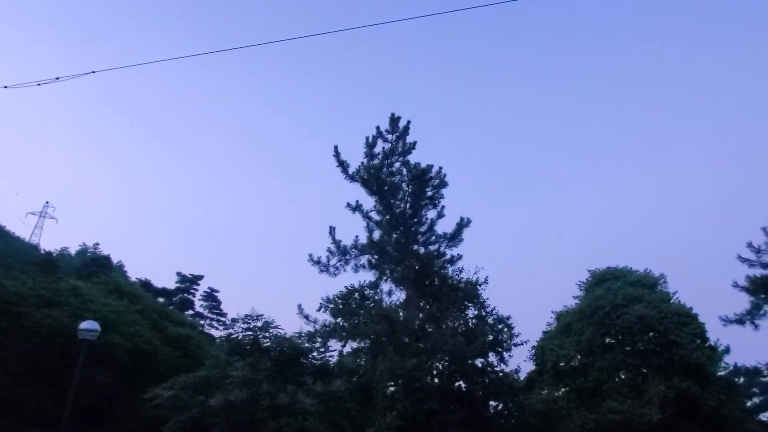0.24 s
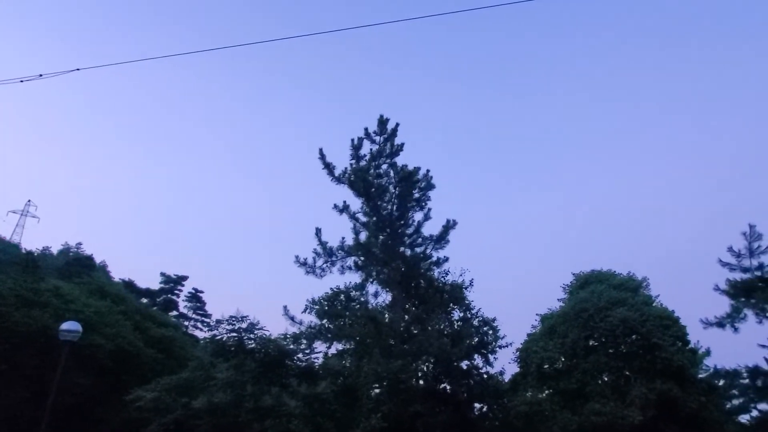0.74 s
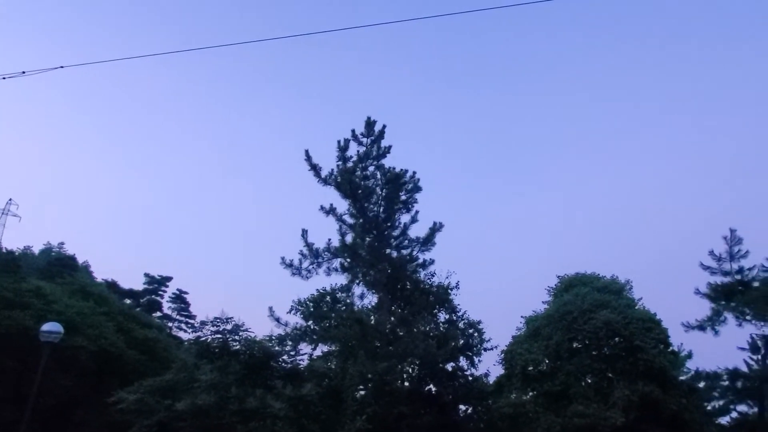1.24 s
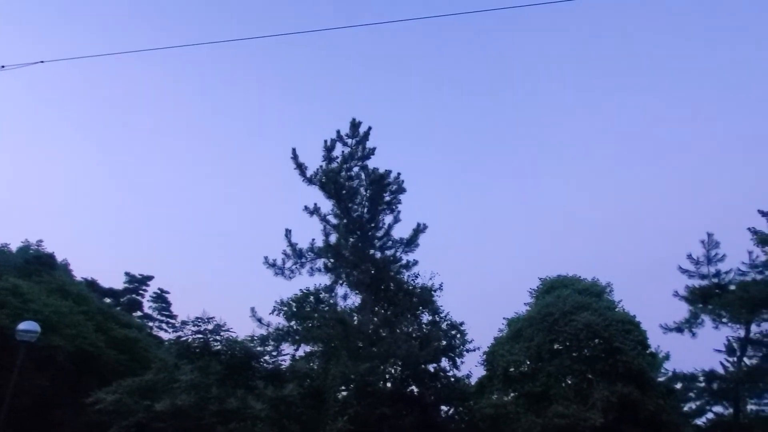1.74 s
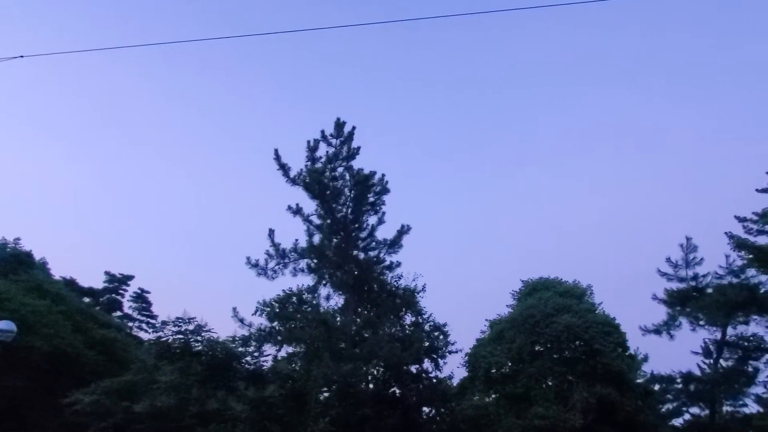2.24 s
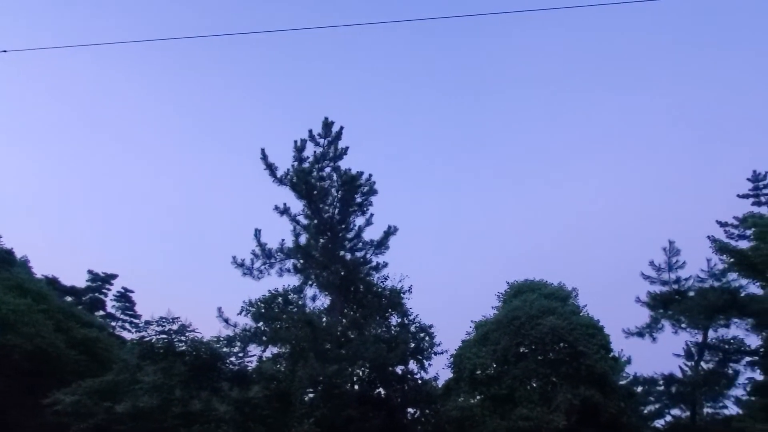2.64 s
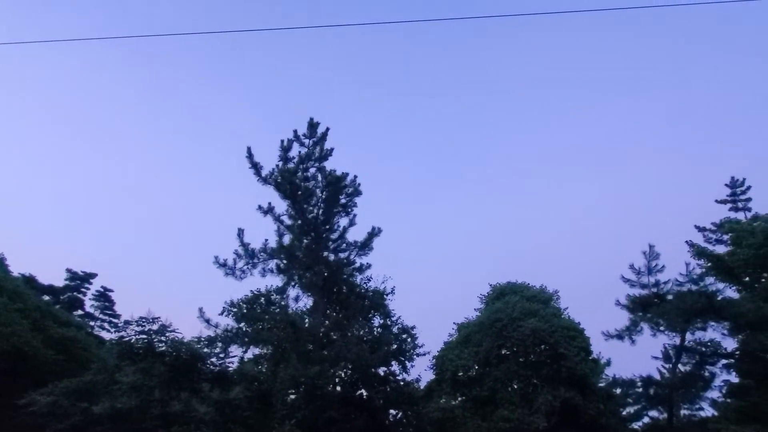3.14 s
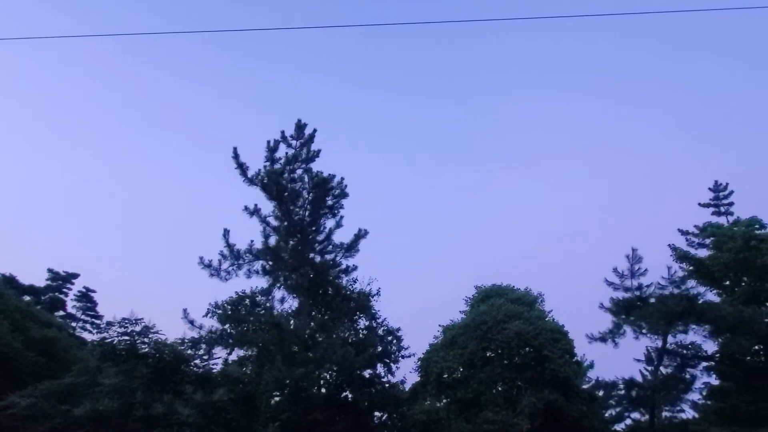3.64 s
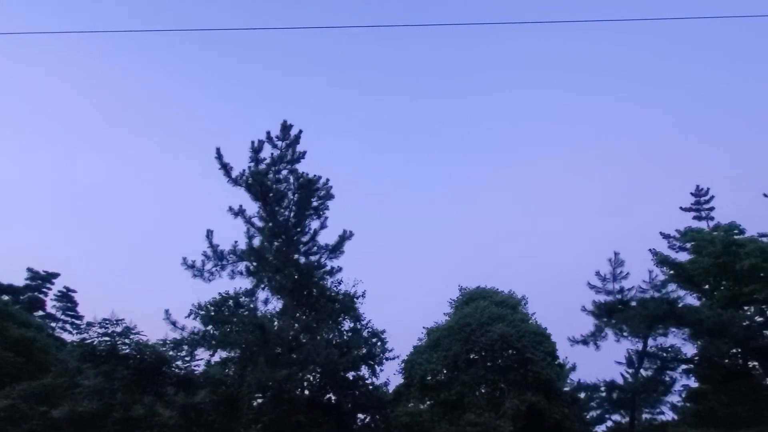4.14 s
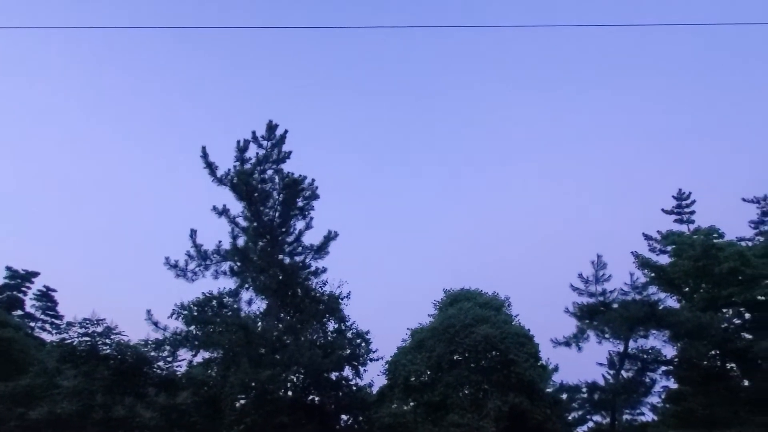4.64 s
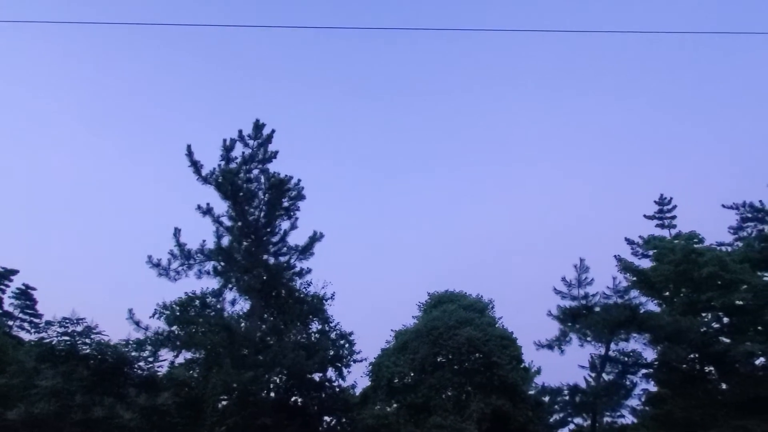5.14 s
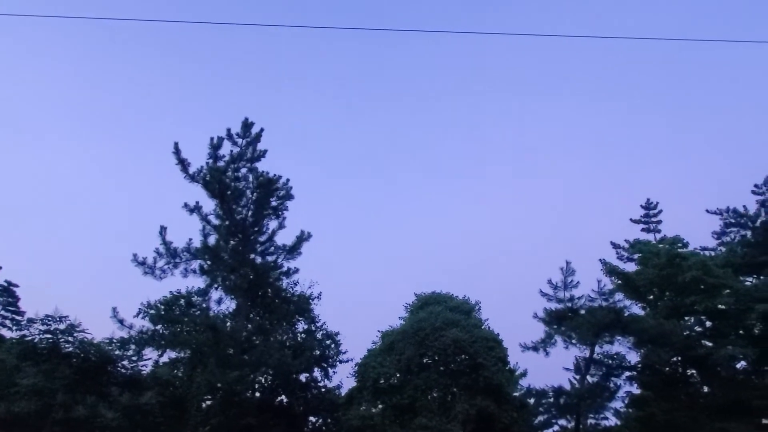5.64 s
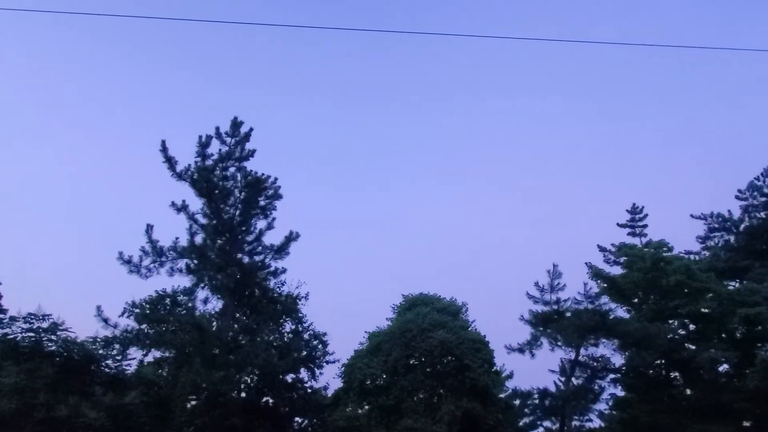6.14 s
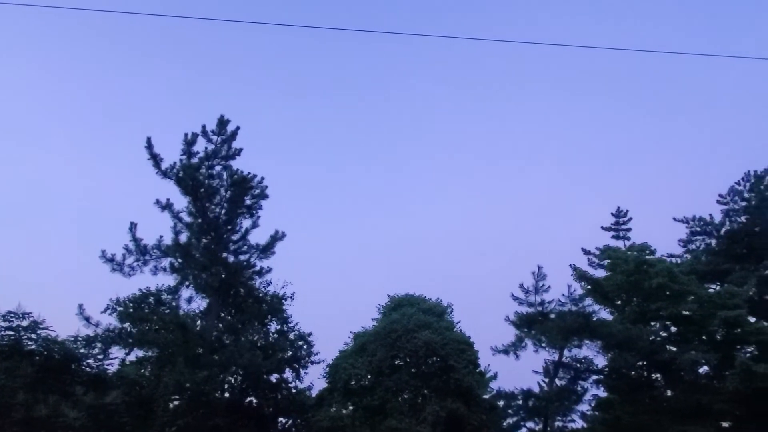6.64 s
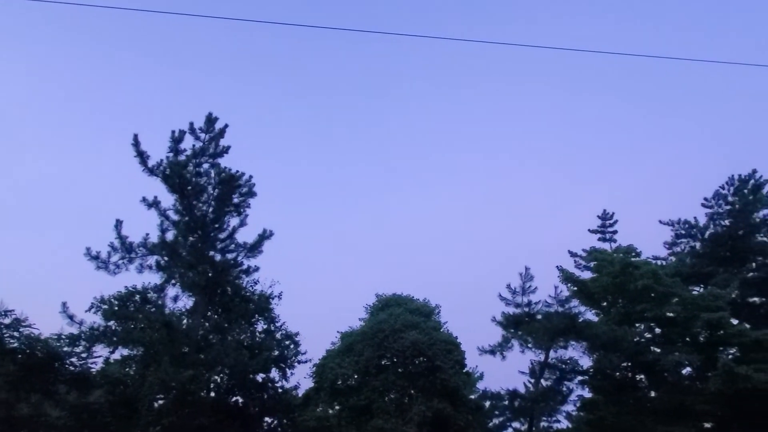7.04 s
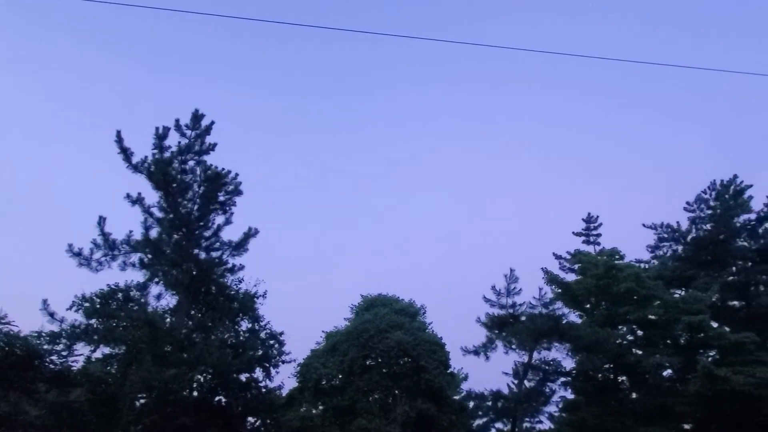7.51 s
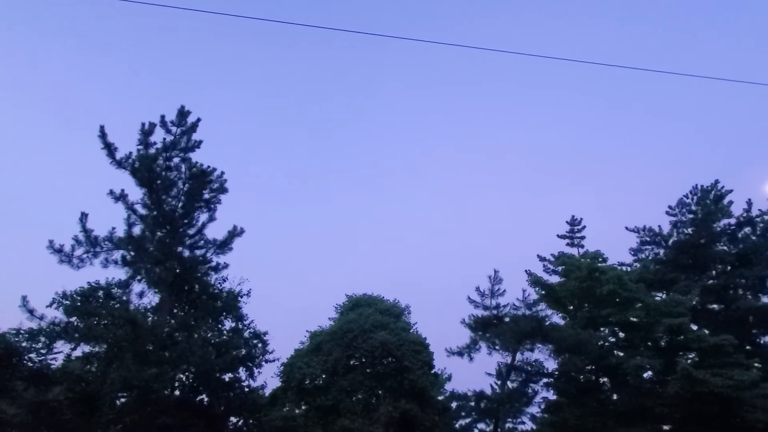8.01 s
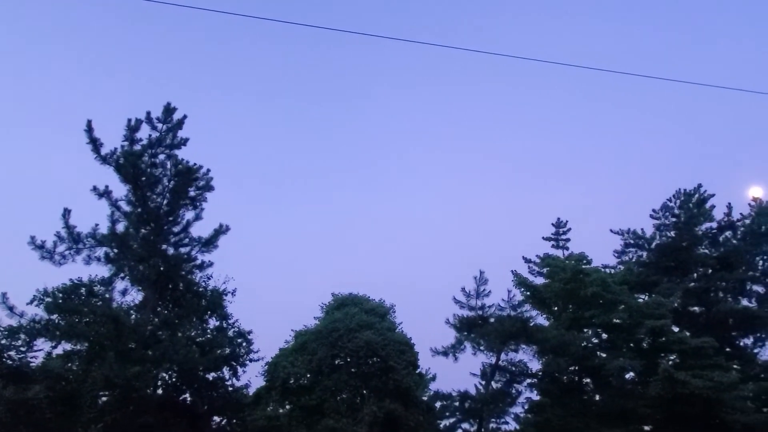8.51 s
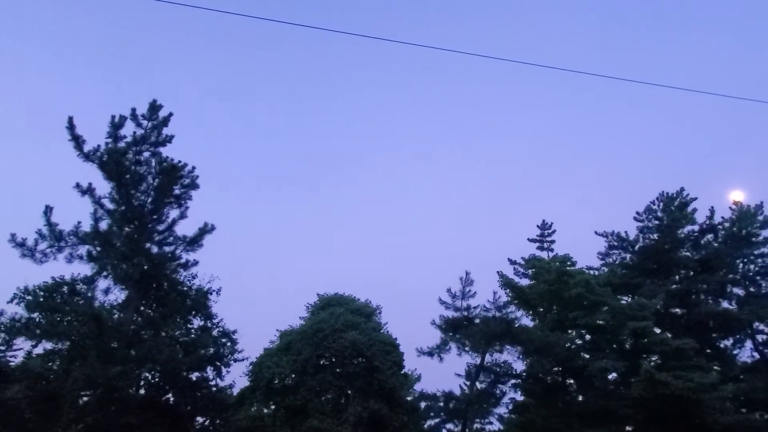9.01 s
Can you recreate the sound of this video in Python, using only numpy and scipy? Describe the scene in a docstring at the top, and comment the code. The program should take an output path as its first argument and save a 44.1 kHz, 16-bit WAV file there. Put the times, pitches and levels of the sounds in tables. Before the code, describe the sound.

A wooded valley at dusk, thick with cicadas. From 0 s a dense, high, sizzling buzz fills both sides, with a steady dry rattle and a slightly deeper buzz inside it, flickering in brief dips. Far evening cicadas throb together at a middle-high pitch, smeared by the trees. At about 0.8 s a near singer begins: clear, whistling, reedy syllables some ten per second, strongest near 1.1 s, each sagging in pitch, the whole phrase sinking slowly, its last pulses slower, ending near 7 s. A slightly higher distant phrase swells around 2.5 s and fades by 7 s. New near trills enter at 8.3 and 8.6 s and continue to the cut at about 9.3 s. Low wind thumps and flutters strike the stereo microphone irregularly, heavier on the left, notably near 0.6, 1.4, 4.2, 5.3 and 6.7 s, over a faint airy floor.

```python
"""Evening cicadas trill clear, falling syllables about ten times a second in a wooded valley at dusk.
Near singers are sums of partials of a tymbal click train; far ones are throbbing tones heard through trees.
Other cicadas buzz densely and high: blurred click trains, filtered. Gusts buffet the two microphone
ports, each on its own, as low-passed noise; filtered noise makes the faint floor of the valley."""
import sys
import numpy as np
from scipy import signal
from scipy.fft import rfft, irfft
from scipy.io import wavfile
from scipy.ndimage import uniform_filter1d

SR = 44100
rng = np.random.default_rng(int(sys.argv[2]) if len(sys.argv) > 2 else 0)


def wrap_up_sound(samples):
    """Save the sound to the file named by the first command line argument, as 16-bit audio."""
    columns = np.atleast_2d(samples).T
    # keep every value between -1 and 1, then stretch to whole-number steps
    tamed = np.clip(columns, -1, 1)
    steps = np.round(tamed * 32767).astype(np.int16)
    wavfile.write(sys.argv[1], SR, steps)


def to_linear_factor(level_db):
    """Convert decibel levels (scalar or array-like) to linear amplitude factors."""
    exponent = np.asarray(level_db, float) / 20
    return 10 ** exponent


N = 408807
FFT_SIZE = N + 793   # 409600 points, a fast size

# Partials of the click train: (multiple of body tone [1], level re its group [dB], lead of its peak [s]).
# Groups: body tone, octave and upper partials; the top ones go by the mean dB of octave and upper.
NEAR_PARTIALS = [(.833, -24, .001), (1.0, 0, .001), (1.833, -16, -.004), (2.0, 0, .001), (2.333, -18, .001),
                 (2.833, -5, .005), (3.0, 1.5, .005), (4.0, -3, .005), (5.0, -19, .006), (5.833, -18, .009),
                 (6.0, -18, .009)]
LATE_PARTIALS = [(.857, -14, .001), (1.0, 0, .001), (1.857, -18, .001), (2.0, 0, .001), (2.125, -17, .001),
                 (2.274, -1, .001), (2.4, -9, .001), (3.0, 0, .005), (5.0, -13, .006)]
# Course of each song: (time [s], body tone [Hz], body level [dB], upper partials' level [dB], pan L-R [dB])
NEAR_PHRASE = [(.77, 2043, -50, -52, 2), (.87, 2042, -50, -50, 2), (1.06, 2083, -39, -45, -1.5),
               (1.45, 2080, -44, -45, -1), (1.8, 2058, -43, -45, -2), (2.3, 2043, -44, -46, .5),
               (3.0, 2034, -45, -48, 1), (4.0, 2032, -44, -47, 2.5), (5.0, 2023, -43, -46, 2.5),
               (5.95, 2020, -45, -47, 1.5), (6.15, 2001, -46, -47, 3), (6.8, 1980, -49, -47.5, 2),
               (7.0, 1979, -51, -52, 1.5)]
LATE_PHRASE = [(8.32, 2102, -57, -56, -1), (8.52, 2169, -50, -51, -1), (8.8, 2170, -45, -49, -.5),
               (9.2, 2140, -48, -53, 1)]
LOW_PHRASE = [(8.6, 2074, -60, -45, -1), (9.2, 2030, -51, -46, 1)]
# Tempo: (syllable number [1], gap before it [s])
NEAR_TEMPO = [(0, .0966), (12, .1), (16, .1055), (22, .0995), (40, .1041), (52, .1113), (58, .1757)]
LATE_TEMPO = [(0, .103), (9, .092)]
LOW_TEMPO = [(0, .1), (6, .098)]
# Octave of the body tone: (time [s], level [dB])
NEAR_OCTAVE = [(.77, -38.5), (.96, -35.5), (1.1, -26), (1.28, -29.5), (1.47, -40), (1.64, -33), (2.1, -35),
               (2.3, -34.5), (2.68, -36.5), (2.88, -45), (3.08, -45), (3.18, -42), (3.5, -38.5),
               (3.8, -35.5), (4.5, -36.5), (4.85, -32), (5.05, -35), (5.4, -32), (5.77, -34.5),
               (6.2, -42.5), (7.0, -45.5)]
LATE_OCTAVE = [(8.321, -39), (8.45, -39), (8.82, -38), (9.051, -41), (9.2, -39.5)]
LOW_OCTAVE = [(8.6, -42), (8.7, -61), (9.05, -48), (9.2, -60)]
# Delay of the right port as the microphone slowly turns: (time [s], lag [ms])
NEAR_LAG = [(1.0, -.3), (4.2, -.244), (6.5, -.18)]
LATE_LAG = [(8.3, .43), (9.2, .43)]


def close_singers():
    """Direct and reverberant sound: three singers stand out, with the forest ringing behind them."""
    near = trill(syllables(.7673, NEAR_TEMPO, NEAR_OCTAVE), NEAR_PHRASE, NEAR_PARTIALS, NEAR_LAG,
                 sigma_s=.013, spread_db=1.5, low_pan_db=-2.5)
    late = trill(syllables(8.321, LATE_TEMPO, LATE_OCTAVE), LATE_PHRASE, LATE_PARTIALS, LATE_LAG,
                 sigma_s=.015, spread_db=1.5, low_pan_db=1.5)
    low = trill(syllables(8.605, LOW_TEMPO, LOW_OCTAVE), LOW_PHRASE, NEAR_PARTIALS, LATE_LAG,
                sigma_s=.014, spread_db=2.0, low_pan_db=.3)
    direct = near + late + low
    return direct + to_linear_factor(-12.5) * forest(direct.mean(axis=0), t60_s=0.56)


def syllables(start_s, tempo, octave, uneven_db=1):
    """Rhythm: syllable times are summed gaps; octave levels follow the phrase, a little uneven."""
    number, gap_s = np.transpose(tempo)
    count = np.arange(number[-1] + 1)
    gaps_s = np.interp(count, number, gap_s) * (count > 0)
    s = start_s + np.cumsum(gaps_s)
    octave_db = np.interp(s, *np.transpose(octave)) + uneven_db * rng.standard_normal(len(s))
    return np.transpose([s, octave_db])


def trill(syllables, phrase, partials, lags, sigma_s, spread_db, low_pan_db, rough_db=2.0, rough_per_s=150):
    """Additive synthesis: each syllable is a swell of tymbal clicks, heard as partials with staggered peaks."""
    margin = 4096
    out = np.zeros((2, N + 2 * margin))
    span = np.arange(-2048, 2048)
    t = span / SR
    multiple, level_db, lead_s = np.transpose(partials)[:, :, None]
    group = np.digitize(multiple, [1.5, 2.2, 4.5])   # body, octave, upper, top
    swell = np.exp(-.5 * ((t + lead_s) / sigma_s) ** 2)
    draws = rng.standard_normal((len(syllables), 2, len(partials), 1))
    rough = to_linear_factor(rough_db * drift(rough_per_s)[0])   # click strength wavers within a syllable
    when, *columns = np.transpose(phrase)
    for (s, octave_db), (vary, turn) in zip(syllables, draws):
        hz, body_db, upper_db, pan_db = [np.interp(s, when, c) for c in columns]
        group_db = np.choose(group, [body_db, octave_db, upper_db, (octave_db + upper_db) / 2])
        db = group_db + level_db + spread_db * vary * (multiple != 2)   # all but the octave vary
        lag_s = np.interp(s, *np.transpose(lags)) / 1000
        where = round(s * SR) + margin + span
        for channel, side in enumerate((.5, -.5)):
            late = t - channel * lag_s   # the lag shifts the right port's phase
            phase = 2 * np.pi * multiple * hz * (late - .1 * late ** 2 / 2)   # the tone sags
            size = np.sqrt(2) * to_linear_factor(db + side * np.where(group == 0, low_pan_db, pan_db))
            out[channel, where] += np.sum(size * swell * np.sin(phase + 9 * turn), axis=0)
    return out[:, margin:margin + N] * rough / np.sqrt(np.mean(rough ** 2))


# Noise spectrum: (frequency [Hz], relative level [dB])
FOLLOWING_COLOUR = [(1500, -81), (2300, 32), (3000, 22), (3600, -20), (4700, -30), (5400, -16), (7000, -37)]


def following_noise(song, noise_db=-32):
    """Envelope following: a faint broad noise rises and falls with the song's level."""
    loudness = np.sqrt(uniform_filter1d(song ** 2, size=600, axis=1) + 1e-18)
    return to_linear_factor(noise_db) * loudness * coloured(rng.standard_normal((2, N)), FOLLOWING_COLOUR)


# Distant evening cicadas: (time [s], body tone level [dB], octave re body tone, before a 3.5 dB lift [dB])
FAR_CHORUS = [(0.0, -47, -3), (1.37, -50, 1), (1.44, -48, 0), (1.99, -51.5, 3.5), (2.55, -46, 2),
              (5.42, -48, -1), (5.68, -49.5, 2), (7.95, -51.5, -2), (8.8, -47, 3), (9.27, -43, 0)]
# One phrase among the distant singers: (time [s], body tone [Hz], level [dB])
FAR_PHRASE = [(2.15, 2140, -69), (2.35, 2183, -49), (2.65, 2254, -45.5), (3.2, 2199, -50.5),
              (4.5, 2170, -49), (5.7, 2162, -52.5), (6.9, 2137, -62), (7.2, 2160, -62)]


def far_singers(count=18, middle_hz=2115, spread=.02):
    """Multiple scattering: singers of many pitches and trill rates reach the ports only through the trees."""
    body_db, octave_db = in_time(FAR_CHORUS)
    places = np.sinh(np.linspace(-1.7, 1.7, count))   # most sing near the middle pitch
    body, octave = sum(unseen_singer(middle_hz * (1 + spread * place), rng.uniform(8.5, 11), 6 + k % 4)
                       for k, place in enumerate(places))
    body = rms_one(forest(body, t60_s=0.42))
    octave = rms_one(forest(octave, t60_s=0.73))
    crowd = to_linear_factor(body_db) * (body + to_linear_factor(octave_db + 3.5) * octave)
    pitch_hz, level_db = in_time(FAR_PHRASE)
    body, octave = rms_one(unseen_singer(pitch_hz, 11.2, 12)) * to_linear_factor(level_db)
    return crowd + forest(body + to_linear_factor(-6.0) * octave, t60_s=0.24)


def unseen_singer(pitch_hz, rate_hz, clicks_per_cycle, sides_db=-16, upper_sides_db=-8, waver=.006):
    """Amplitude modulation: body tone and octave, each with a side tone, throb at the trill rate."""
    wander = waver * drift(2.5)[0] + .009 * drift(60)[0]
    turn = 2 * np.pi * np.cumsum(pitch_hz * (1 + wander)) / SR
    beat = 2 * np.pi * (rate_hz * np.arange(N) / SR + rng.random())
    throb = np.exp(3.0 * np.cos(beat)) * to_linear_factor(2.5 * drift(.8)[0])
    side = turn * (1 - 1 / clicks_per_cycle)   # one click rate below the body tone
    body = np.sin(turn) + to_linear_factor(sides_db) * np.sin(side)
    octave = np.sin(2 * turn) + to_linear_factor(upper_sides_db) * np.sin(turn + side)
    return throb * np.array([body, octave])


# Swarm spectrum: (frequency [Hz], relative level [dB])
SWARM_COLOUR = [(2940, -27), (5000, -17), (5400, -14), (5960, -65), (6590, -0.5), (7200, 5.5), (7800, 1.5),
                (8520, 5.5), (10600, -17.5), (12500, -25), (16200, -23), (22000, -120)]
# One singer with a steady rattle: (time [s], level [dB])
STEADY_BUZZER = [(0, -49.5), (2.3, -51.5), (2.8, -49.5), (4.3, -47), (5, -54), (7.2, -49.5), (7.6, -45.5),
                 (9.27, -46)]
# One singer with a deeper buzz: (time [s], level before a 14.5 dB lift [dB])
DEEP_BUZZER = [(0.0, -60.5), (0.67, -56.5), (0.93, -55.5), (2.24, -54.5), (2.76, -60.5), (4.33, -58),
               (4.7, -55), (5.19, -58), (5.42, -56.5), (6.66, -57.5), (7.07, -64.5), (7.92, -64),
               (9.06, -59), (9.27, -58)]


def buzzers(count=12, direct=0.75, pan_db=0.9):
    """Incoherent summation: many click trains blur to a broad buzz; one rattles steadily, one sits lower."""
    swarm_db = swarm_level() + 1.08 * drift(6)[0]
    left, right, both = [sum(swarm_singer() for _ in range(count)) for _ in range(3)]
    both = np.array([both, np.roll(both, 19)])   # heard 19 samples later at the right port
    swarm = coloured(np.array([left, right]) + direct * both, SWARM_COLOUR)
    swarm = swarm * to_linear_factor(swarm_db + .7 * drift(18)) * panned(pan_db)[:, None]

    rattle = clicks(545, jitter=.004, uneven_db=4.0)
    ribs = np.array([0.93, -0.83, 0.54, 0.41])   # four ribs buckle in turn
    rattle = rattle * ribs[np.cumsum(rattle > 0) % 4]
    rattle = rattle * panned(3.0)[:, None] + to_linear_factor(-5) * forest(rattle, t60_s=.12)
    steady = coloured(rattle, [(6000, -26.0), (7200, 0.0), (8300, 10.5), (8900, -17), (10300, -3), (12000, -35)])
    steady = steady * to_linear_factor(in_time(STEADY_BUZZER)[0])

    deep = clicks(450, jitter=.2, uneven_db=4.0) * rng.choice([-1, 1], N)
    deep = coloured(forest(deep, t60_s=0.083), [(5200, -38), (5600, -9), (6000, -5.5), (6500, 5.5), (7200, -34)])
    deep = deep * to_linear_factor(in_time(DEEP_BUZZER)[0] + 14.5)
    return swarm + steady + deep


def swarm_singer():
    """Random pulse train: clicks of either sign whose level drifts."""
    train = clicks(rng.uniform(900, 1500), jitter=.3, uneven_db=1.5)
    return train * rng.choice([-1, 1], N) * to_linear_factor(2.0 * drift(16)[0])


def clicks(per_s, jitter, uneven_db):
    """Pulse train: tymbal clicks with uneven timing and strength."""
    unevenness = rng.standard_normal(N // 64 + 1).repeat(64)[:N]
    turns = np.cumsum(per_s * (1 + jitter * unevenness) / SR)
    struck = np.diff(np.floor(turns), prepend=0) > 0
    return struck * to_linear_factor(uneven_db * rng.standard_normal(N))


# The whole swarm: (time [s], level [dB])
SWARM = [(0, -37), (.2, -33), (.65, -35.5), (1.0, -34), (3.2, -36), (4.15, -37.5), (4.4, -34), (5.0, -35),
         (6.2, -36), (7.5, -38), (8.2, -35.5), (8.5, -34.5), (9.27, -34.8)]
# Brief dips of the level: (time [s], change of level [dB])
DIPS = [(1.109, -6), (1.45, -3.5), (1.8, -2.5), (2.21, -4), (2.9, -4), (3.44, 0), (3.85, -3), (4.24, -6.5),
        (5.04, -2), (5.87, -4), (6.0, -4.5), (6.48, -9), (6.87, -3.5), (7.26, -1), (7.752, -3.5),
        (7.92, -4.5), (8.17, -7), (8.699, -8)]


def swarm_level(dip_half_s=0.018):
    """Level envelope: a slow level curve with brief dips, in dB."""
    return in_time(SWARM)[0] + bumps(*np.transpose(DIPS), dip_half_s)


# Low wind noise spectrum: (frequency [Hz], relative level [dB])
WIND_COLOUR = [(15, -20), (30, -8.5), (60, -1.5), (90, -3.5), (130, -13.5), (220, -20.5), (330, -42.5),
               (600, -80)]
# Higher rustle spectrum: (frequency [Hz], relative level [dB])
RUSTLE_COLOUR = [(200, -51), (270, -3), (450, -13.5), (900, -30), (1600, -33), (3000, -70)]
# A lone higher puff of air: (time [s], level [dB], pan L-R [dB], half length to 1/e [s])
PUFF = (6.555, -53, -10, .03)


def wind(evened=0.45, rustle_db=-28):
    """Turbulent pressure: low lumps unrelated at the two ports; the stronger gust rustles higher at both."""
    lumps = coloured(rng.standard_normal((2, N)), WIND_COLOUR)
    local_power = uniform_filter1d(lumps ** 2, size=1500, axis=1)
    lumps = rms_one(lumps / local_power ** (evened / 2))   # partly evened out
    gust_db = gusts()
    shared, *own = rng.standard_normal((3, N))
    rustle = coloured(0.98 * shared + np.array(own), RUSTLE_COLOUR)
    s, db, pan_db, half_s = PUFF
    puff = to_linear_factor(db) * panned(pan_db)[:, None] * np.exp(-((np.arange(N) / SR - s) / half_s) ** 4)
    rustle_gain = to_linear_factor(gust_db.max(axis=0) + rustle_db + 1.7 * np.clip(drift(30), -2, 1.5))
    return lumps * to_linear_factor(gust_db + 1.2 * drift(25, channels=2)) + rustle * (rustle_gain + puff)


# Breeze at the left port: (time [s], level [dB])
WIND_LEFT = [(0, -46), (.4, -43), (.9, -48.5), (1.3, -38.5), (2.2, -49), (2.5, -39.5), (2.9, -53.5),
             (3.6, -35.5), (4.0, -34.5), (4.4, -45.5), (5.0, -46), (5.3, -32.5), (5.8, -46.5), (6.5, -47),
             (6.75, -37.5), (7.2, -52), (7.7, -41), (8.17, -50), (8.45, -43.5), (9.27, -44)]
# Spells when the right channel's low cut opens and lets wind through: (start [s], end [s], level [dB])
SPELLS = [(0.093, 0.394, -46), (0.46, .74, -48), (1.36, 1.446, -36), (1.95, 2.365, -50), (2.43, 2.86, -45),
          (2.95, 3.114, -50), (3.494, 3.75, -50), (3.866, 4.33, -40.5), (4.424, 4.503, -36.5),
          (4.627, 4.86, -51), (6.097, 6.385, -47.5), (7.64, 7.692, -36.5), (7.942, 8.2, -49),
          (8.343, 8.68, -49), (8.816, 8.963, -50), (9.123, 9.274, -51)]
# Buffets: (time [s], left level [dB], right level [dB], half length to half pressure [s])
BUFFETS = [(0.456, -35, -67.3, 0.044), (0.573, -31, -26.5, 0.015), (0.677, -32.5, -42, 0.05),
           (1.06, -40.5, -68.1, 0.035), (1.223, -38, -55, 0.022), (1.378, -26.5, -45, 0.012),
           (1.757, -35.5, -44.9, 0.013), (1.97, -36.8, -51, 0.027), (2.052, -46, -37, 0.015),
           (2.483, -43, -48, 0.032), (3.242, -36.6, -64.0, 0.0093), (3.388, -38, -63.3, 0.018),
           (3.575, -45, -34, 0.029), (3.644, -29.9, -35, 0.015), (3.938, -32, -29.5, 0.043),
           (4.1, -43, -37, 0.015), (4.223, -27.5, -27.5, 0.011), (4.293, -49, -49, 0.017),
           (4.831, -52, -38.5, 0.029), (5.23, -24.7, -62, 0.027), (5.311, -53, -67, 0.021),
           (5.418, -26.5, -53, 0.032), (5.555, -36, -29, 0.05), (5.677, -40, -73, 0.024),
           (6.026, -34, -39.5, 0.0097), (6.137, -52, -56, 0.022), (6.694, -28.5, -39, 0.014),
           (6.775, -30, -30, 0.016), (6.926, -43, -35.5, 0.013), (7.38, -28.5, -33, 0.011),
           (7.51, -38, -69, 0.021), (7.628, -38.5, -62.5, 0.049), (7.802, -35.0, -72.8, 0.015),
           (7.858, -41, -45, 0.015), (8.03, -41, -35, 0.035), (8.403, -35, -44.7, 0.032),
           (8.552, -41.5, -44, 0.047), (8.801, -37.0, -45, 0.015)]


def gusts(left_flutter_db=4.5, right_flutter_db=5.5, cut_db=-74.5, spell_edge_s=0.039):
    """Power addition: wind level in each channel in dB, a fluttering breeze with the buffets on top."""
    t = np.arange(N) / SR
    opening_db = np.max([(db - cut_db) * np.clip(np.minimum(t - start, end - t) / spell_edge_s + .5, 0, 1)
                         for start, end, db in SPELLS], axis=0)
    flutter = np.array([[left_flutter_db], [right_flutter_db]]) * drift(14, channels=2)
    breeze_db = np.array([in_time(WIND_LEFT)[0], cut_db + opening_db]) + flutter
    s, left_db, right_db, half_s = np.transpose(BUFFETS)
    blows = np.array([bumps(s, to_linear_factor(db), half_s) for db in (left_db, right_db)])
    return 10 * np.log10(to_linear_factor(breeze_db) ** 2 + blows ** 2)


# Far traffic and leaves: (frequency [Hz], relative level [dB])
VALLEY = [(170, -33), (240, -2), (320, -1.5), (500, -7), (800, -14.5), (1300, -20), (2500, -17),
          (3000, -16), (3500, -18), (5200, -17), (12000, -10.5), (16000, -15.5)]
# Likeness of the two ports: (frequency [Hz], correlation before clipping to +-1 [1])
LIKENESS = [(200, 0.59), (450, 0.62), (800, 0.48), (1250, -0.44), (2000, -1.8), (3300, 0.24),
            (6000, -0.056)]


def valley(follow=0.44, level_db=-53):
    """Partial coherence: a steady floor, partly alike at both ports, wavering a little with the level curve."""
    alike = np.clip(at_bins(LIKENESS), -1, 1)
    mid, side = rfft(rng.standard_normal((2, FFT_SIZE)))
    spectra = np.sqrt(1 + alike) * mid + np.sqrt(1 - alike) * side * [[1], [-1]]
    pair = irfft(spectra, FFT_SIZE)[:, :N]
    curve_db = swarm_level()
    waver_db = follow * (curve_db - curve_db.mean()) + .8 * drift(16)
    return coloured(pair, VALLEY) * to_linear_factor(level_db + waver_db)


def forest(x, t60_s):
    """Reverberation: trunks scatter sound into a dying noise tail, another one at each port; energy 1."""
    t = np.arange(SR // 2) / SR
    tail = rng.standard_normal((2, len(t))) * to_linear_factor(-60 * t / t60_s) * np.clip(t / 0.0084, 0, 1)
    tail = tail / np.sqrt(np.sum(tail ** 2, axis=1, keepdims=True))
    return signal.fftconvolve(x * np.ones((2, 1)), tail, axes=1)[:, :N]


def rms_one(x):
    """Normalisation: scale to rms 1 along time."""
    return x / np.sqrt(np.mean(x ** 2, axis=-1, keepdims=True) + 1e-20)


def in_time(rows):
    """Linear interpolation: columns of a table as curves over all samples."""
    s, *columns = np.transpose(rows)
    return [np.interp(np.arange(N) / SR, s, c) for c in columns]


def at_bins(points):
    """Logarithmic frequency: a (Hz, value) table read at every FFT bin on a log axis."""
    hz, value = np.transpose(points)
    bins_hz = np.fft.rfftfreq(FFT_SIZE, 1 / SR)
    return np.interp(np.log(np.maximum(bins_hz, 1)), np.log(hz), value)


def coloured(x, spectrum):
    """Linear filtering: shape by a (Hz, dB) spectrum, then scale to rms 1."""
    return rms_one(irfft(rfft(x, FFT_SIZE) * to_linear_factor(at_bins(spectrum)), FFT_SIZE)[..., :N])


def drift(rate, channels=1):
    """Band-limited chance: random knots at a rate per second, joined by lines; spread about 1."""
    knots = rng.standard_normal((channels, int(rate * N / SR) + 3))
    when = np.arange(N) * rate / SR
    return np.array([np.interp(when, np.arange(len(k)), k) for k in knots]) * 1.22


def panned(pan_db):
    """Level difference: left and right gains."""
    return to_linear_factor(np.multiply.outer([.5, -.5], pan_db))


def bumps(s, height, half_s):
    """Superposition: a bell-shaped bump at each time, half as high at half_s from its middle."""
    t = np.arange(0, N + 64, 64) / SR
    distance = (t - s[:, None]) / np.reshape(half_s, (-1, 1))
    out = np.sum(height[:, None] * np.exp(-np.log(2) * distance ** 2), axis=0)
    return np.interp(np.arange(N) / SR, t, out)


def scene():
    """Superposition: all singers, the noise that follows them, wind and floor."""
    song = close_singers() + far_singers()
    return song + following_noise(song) + buzzers() + wind() + valley()


def band_limit(x):
    """A steep low-pass at the top of the band."""
    return signal.sosfilt(signal.butter(12, 15800, fs=SR, output="sos"), x)


def record(dry):
    """Signal chain: the finished two-channel mix goes through the last stage."""
    return band_limit(dry)


dry = scene()
out = record(dry)
wrap_up_sound(out)
```